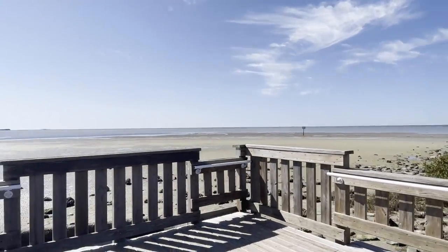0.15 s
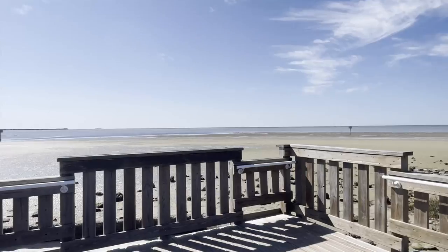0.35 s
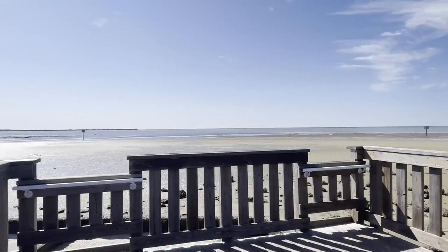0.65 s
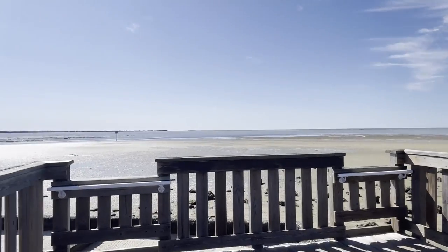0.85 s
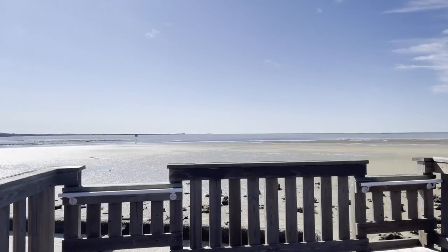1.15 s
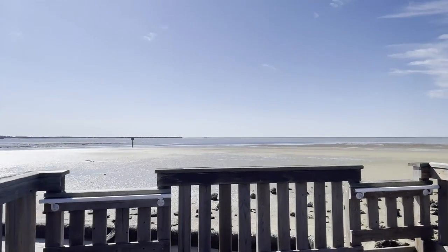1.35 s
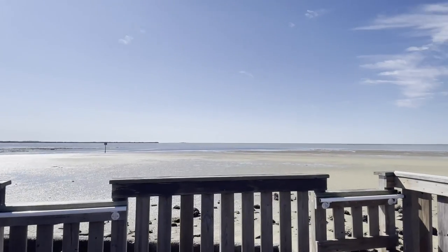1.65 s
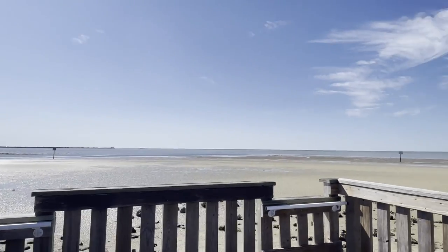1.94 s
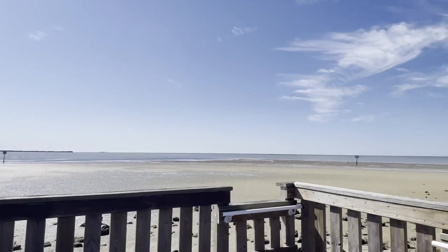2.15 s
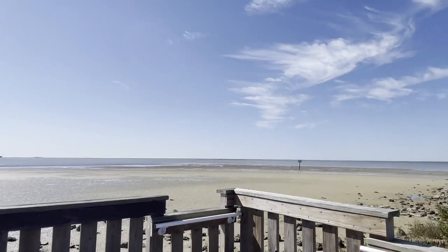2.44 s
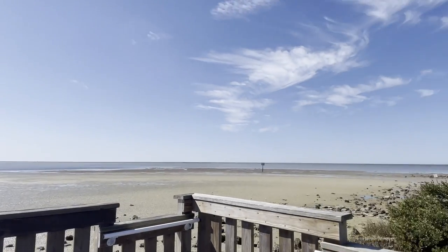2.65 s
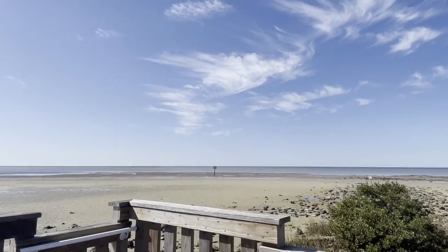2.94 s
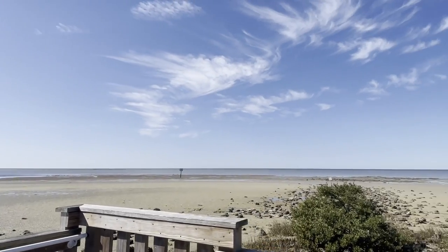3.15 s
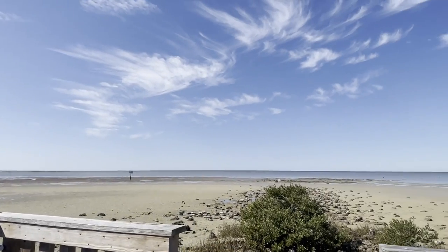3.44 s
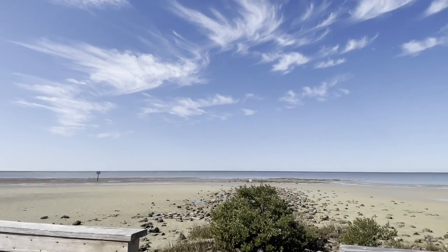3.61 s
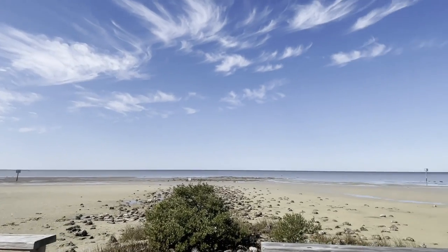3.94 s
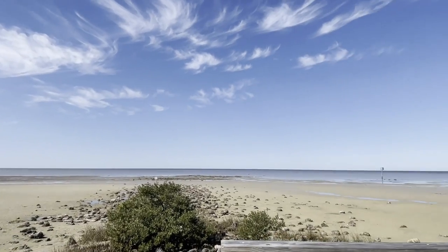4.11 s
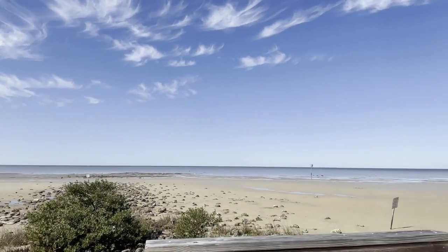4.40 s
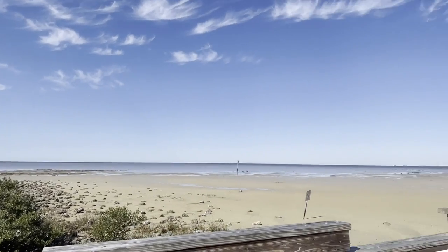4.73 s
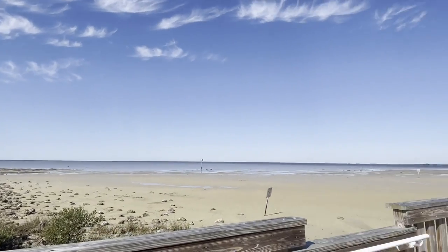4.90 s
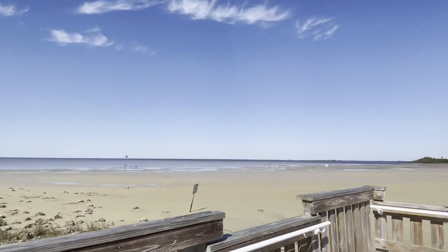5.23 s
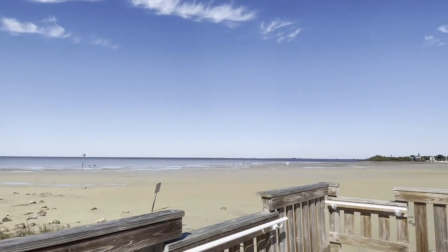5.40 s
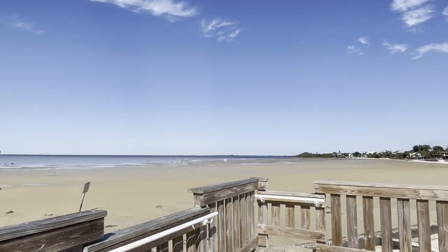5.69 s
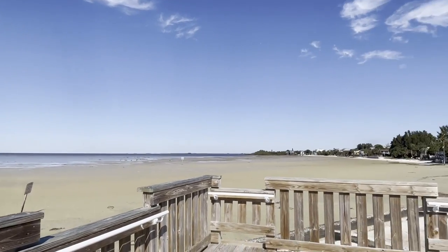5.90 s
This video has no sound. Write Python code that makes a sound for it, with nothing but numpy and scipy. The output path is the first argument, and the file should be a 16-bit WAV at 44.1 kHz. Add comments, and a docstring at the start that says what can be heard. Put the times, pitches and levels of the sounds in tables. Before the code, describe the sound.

After a rumbling gust, hollow, gritty steps cross a seaside boardwalk, with thin falling bird whistles and a faint wash of sea.

```python
"""A walk on a wooden boardwalk by the shore, heard on the left channel only, over a wash of far water.
First, clothes rustle and tick and the grip squeaks as a gust builds and buffets the microphone.
From 1.6 s, as the wind drops, ten evenly paced steps boom through planks and joists, each with a
sandy scuff. A bird joins in with thin, falling whistles that scatter off the deck and railings.
From about 4 s the steps grow lighter, leaving mostly the scuff of the soles."""
import sys
import numpy as np
from scipy import signal
from scipy.fft import rfft
from scipy.io import wavfile
from scipy.ndimage import uniform_filter1d

SR = 44100
rng = np.random.default_rng(int(sys.argv[2]) if len(sys.argv) > 2 else 0)


def bounce(signal):
    """Save signal as a 16-bit WAV file at the path given by the first command-line argument."""
    frames = np.transpose(np.atleast_2d(signal))
    limited = np.clip(frames, -1, 1)
    pcm = np.round(limited * 32767).astype(np.int16)
    wavfile.write(sys.argv[1], SR, pcm)


N = 267113
TIME = np.arange(N) / SR

# footfalls, with relative levels: (time [s], weight on the frame [dB], plank knock [dB],
# hollow ring [dB], scuff [dB], scuff centre [Hz], scuff focus [dB/octave^2], sand [dB])
FOOTFALLS = [(1.578, -65.5, -55.5, -67.5, -63.5, 1370, 7, -84),
             (2.067, -62.5, -56.5, -60.5, -60.5, 1440, 9, -79), (2.535, -65, -60, -68, -61.5, 940, 33, -73),
             (3.017, -67.5, -63.5, -57, -61, 1250, 5.5, -76),
             (3.489, -64, -60, -74, -55.5, 1310, 7.5, -71.5),
             (3.929, -74.5, -75, -68.5, -58.5, 1590, 0, -70.5),
             (4.364, -73.5, -74, -68, -60, 1630, 2.5, -70.5), (4.785, -84.5, -88, -81, -66, 1260, 13, -80),
             (5.235, -90, -72.5, -84, -63.5, 1120, 31, -75), (5.69, -78, -70, -91, -64, 1480, -4, -85)]
# the deck's deepest ring, two close modes that beat slowly: (frequency [Hz], t60 [s])
JOIST_MODES = [(178.7, 1.2), (183.7, 1.3)]
# higher ringing of the planks: (frequency [Hz], relative level [dB], t60 [s])
PLANK_MODES = [(208.4, 6.5, 0.71), (324.5, 11.5, 0.36), (346.7, 10.5, 0.64), (393, 10, 0.83),
               (481.6, -0.5, 0.8), (622, -1, 0.63), (664, -9, 0.94), (744, -5, .8), (921, 1, 0.77),
               (1093, -11.5, 1), (1330, -9, 1), (1585, -7.5, 0.69), (1760, -6.5, 0.54)]
# tone of the plank knock, trodden board, sole scuff and sand: (frequency [Hz], gain [dB])
KNOCK_EQ = [(90, -7), (170, 7.5), (270, 0), (345, 8), (440, -3), (520, -1), (650, -1), (800, -22),
            (1000, -35), (1800, -10.5), (2800, -46), (6000, -69)]
BOARD_EQ = [(300, -26), (480, -17), (580, -3.5), (625, 4.5), (680, -4.5), (780, -28), (2000, -88)]
SCUFF_EQ = [(300, -28), (900, 3.5), (1120, 2), (1300, 3), (1480, -6), (1650, 1.5), (2150, 1), (2700, -13),
            (3300, 2.5), (4000, -11), (4700, -27), (6500, -43), (12000, -52)]
SAND_EQ = [(2300, -22), (3100, -2.5), (3950, 2.5), (4500, -20), (7000, -47)]

# wind strength, one strong gust that dies down: (time [s], relative level [dB])
WIND_STRENGTH = [(0, -52.5), (.28, -63), (.4, -59), (.57, -60.5), (.69, -52), (1.0, -55), (1.17, -47),
                 (1.38, -44), (1.55, -48), (1.75, -55), (2.25, -56.5), (2.85, -57.5), (3.05, -60),
                 (3.3, -59), (3.55, -61.5), (4.2, -68), (5.9, -67), (6.05, -59)]
# single eddies hitting the microphone: (time [s], width [s], peak [dB])
WIND_BUFFETS = [(.04, .012, -31), (.775, .013, -32), (1.18, .012, -27), (1.37, .0095, -26),
                (1.552, .007, -31)]
# hollow puffs of air across the microphone port: (time [s], length [s], level [dB])
PORT_PUFFS = [(0, 0.076, -65.5), (0.711, 0.21, -65.5), (1.139, 0.19, -64), (1.803, 0.039, -59.5)]
# tone of the wind's slow pressure, its flutter and its puffs: (frequency [Hz], gain [dB])
PRESSURE_EQ = [(2, -3), (6, 10.5), (13, -5.5), (20, -2.5), (32, -34), (90, -101)]
FLUTTER_EQ = [(12, -17), (24, 4), (35, 2), (62, -7.5), (85, -17), (125, -22), (250, -44.5), (500, -59),
              (1500, -100)]
PUFF_EQ = [(80, -21), (210, 7), (270, 0.5), (350, -7.5), (900, -45)]

# bird notes: (time [s], length [s], top pitch [Hz], final pitch [Hz], sag of the slide [exponent],
# direct level [dB], near scatter [dB], far tail [dB])
BIRD_NOTES = [(1.822, .1, 3980, 3330, 1.4, -74, -72, -80), (2.756, .125, 4100, 3310, 2.9, -65, -71, -71),
              (3.739, .108, 3990, 3100, 1.6, -59, -68.5, -73),
              (4.562, .107, 3900, 3190, 2.6, -61, -67.5, -73),
              (5.746, .098, 3800, 3410, 2.5, -63, -68, -75), (5.849, .022, 3350, 3000, 1, -69, -74, -80)]

# ticks of clothing and grit: (time [s], relative level [dB], pitch [Hz], t60 [s], low-pass [Hz])
CLOTHING_TICKS = [(0.0312, -51.5, 5900, 0.006, 12000), (0.1418, -40, 2960, 0.013, 3300),
                  (0.1416, -50, 458, 0.029, 2220), (.874, -53, 2150, 0.016, 4000),
                  (1.3575, -55.5, 3830, 0.016, 8000), (1.5354, -42.5, 4630, .006, 13000),
                  (1.548, -51, 4200, 0.009, 5000), (2.5417, -52.5, 3800, 0.009, 9500),
                  (2.5527, -51, 2860, 0.022, 9600), (4.152, -53.5, 4000, 0.011, 8500),
                  (5.381, -56.5, 6400, 0.016, 9000)]
# squeaks of the grip: (time [s], length [s], first pitch [Hz], last pitch [Hz], peak [dB])
GRIP_SQUEAKS = [(1.15, 0.0081, 4280, 1680, -51.5), (1.151, 0.016, 4220, 2650, -54)]
# sleeve and jacket brushing as the body moves: (middle [s], length [s], level [dB])
SLEEVE_BRUSHES = [(0.006, 0.059, -64.5), (0.575, 0.15, -71), (0.833, 0.63, -74), (1.168, 0.21, -71.5),
                  (1.567, 1, -73.5), (2.258, 0.18, -71), (2.563, 0.073, -70), (2.91, 0.96, -77.5),
                  (3.537, .05, -72), (4.132, 0.17, -73.5), (5.291, 0.34, -70), (5.577, 0.58, -77)]
# tone of the ticks and of rubbing cloth: (frequency [Hz], gain [dB])
TICK_EQ = [(200, -14), (1000, -10), (2000, -5), (3700, 0), (4500, 0), (5300, -6), (6500, -3), (10000, -16),
           (15000, -27)]
CLOTH_EQ = [(500, -3), (1500, -1.5), (3650, 2.5), (4200, -1), (4900, -9), (6300, -3.5), (7800, -9),
            (10000, -17), (15000, -24.5)]

# tone of the distant sea and breeze, and of a thin hiss: (frequency [Hz], gain [dB])
SHORE_EQ = [(60, 5), (130, 2), (350, -6.5), (700, -4), (1200, -8.5), (2500, -11.5), (3600, -14),
            (4900, -25.5), (6400, -25.5), (9500, -33.5), (15000, -39.5)]
THIN_HISS_EQ = [(1500, -22), (2450, 3), (3000, -9), (4500, -18), (5900, -6.5), (6900, -27), (12000, -24)]
# fader moves for those two beds: (time [s], level [dB])
SHORE_FADER = [(0, -63.5), (1.2, -69), (1.7, -64), (3.5, -65.5), (5, -71), (6.06, -68.5)]
THIN_HISS_FADER = [(1.2, -100), (1.45, -76.5), (2.3, -72), (2.6, -89), (3.65, -102)]


def footsteps(boom_db=10, ring_db=1, scuff_trim_db=1, blur_t60=0.78, board_t60=0.67):
    """Each footfall booms in the joists and rings the planks while the sole scuffs over sandy wood."""
    out, t = np.zeros(N), np.arange(SR) / SR
    hz, db, t60 = np.transpose(PLANK_MODES)[:, :, None]
    spot_db, detune, build_cycles = 1.2, .002, 18
    boom = sum(np.sin(2 * np.pi * f * t) * swell(t, 0.087, decay) for f, decay in JOIST_MODES)
    for s, weight_db, knock_db, hollow_db, scuff_db, centre_hz, focus_db, sand_db in FOOTFALLS:
        # each spot on the deck favours and bends other modes
        louder, sharper, phase = rng.standard_normal((3, *hz.shape))
        modes = np.sin(2 * np.pi * (hz * (1 + detune * sharper) * t + phase))
        ring = (gain_of(db + spot_db * louder) * modes * swell(t, build_cycles / hz, t60)).sum(0)
        frame = gain_of(weight_db) * (gain_of(boom_db) * boom + gain_of(ring_db) * ring)
        knock = gain_of(knock_db) * equalise(noise(SR), KNOCK_EQ) * swell(t, 0.015, blur_t60)
        hollow = gain_of(hollow_db) * equalise(noise(SR), BOARD_EQ) * swell(t, 0.0053, board_t60)
        # the heel lands at once, softer on light steps, then the sole rolls down
        heel = np.interp(weight_db, [-80, -66], [.1, .5])
        tread = heel * swell(t, 0.0025, 0.13) + swell(t, 0.028, blur_t60)
        scuff = equalise(board_noise(SR), SCUFF_EQ, centre_hz, focus_db) * tread
        sand = gain_of(sand_db) * equalise(board_noise(SR), SAND_EQ) * tread
        add(out, s, frame + knock + hollow + sand + gain_of(scuff_db + scuff_trim_db) * scuff)
    return out


def board_noise(size, width_hz=110, depth_db=3.2):
    """Friction noise through one board's own uneven set of broad resonances."""
    spectrum = rfft(noise(size))
    bumps = uniform_filter1d(noise(len(spectrum)), round(width_hz * size / SR))
    return np.fft.irfft(spectrum * gain_of(depth_db * np.clip(unit_rms(bumps), -2, 2)), size)


def wind(ceiling_db=-22, knee_db=-57, steepness=2.45, flutter_db=4, gusty_db=1.8):
    """Wind strength drives slow pressure swings and faster eddies; puffs cross the microphone port."""
    strength = fader(WIND_STRENGTH)
    push = gain_of(ceiling_db) / (1 + (gain_of(knee_db) / strength) ** steepness)  # flattens past the knee
    pressure = equalise(noise(N), PRESSURE_EQ) * push
    flutter = equalise(noise(N), FLUTTER_EQ) * strength * gain_of(gusty_db * drift(N, 12))
    out = pressure + buffets() + gain_of(flutter_db) * flutter
    for s, length, db in PORT_PUFFS:
        fade = signal.windows.tukey(round(length * SR), .7)
        add(out, s, gain_of(db) * fade * equalise(noise(SR), PUFF_EQ)[:len(fade)])
    return out * signal.windows.tukey(N, .008)


def buffets():
    """Each large eddy is one push on the microphone between two shallow dips."""
    out = np.zeros(N)
    for s, width, db in WIND_BUFFETS:
        u = (TIME - s) / width
        out += gain_of(db) * (1 - u ** 2) * np.exp(-u ** 2 / 2)
    return out


def bird(echoes_per_s=2000):
    """Deck and railings scatter the whistles; the shore returns a faint, longer tail."""
    out, t = np.zeros(N), np.arange(SR // 2) / SR
    near_tail, far_tail = swell(t, 0.0016, t60=.08), swell(t, .008, t60=.65)
    for s, length, top_hz, final_hz, sag, direct_db, near_db, far_db in BIRD_NOTES:
        note = whistle(length, top_hz, final_hz, sag)
        add(out, s, gain_of(direct_db) * note)
        for db, tail in (near_db, near_tail), (far_db, far_tail):
            echoes = noise(len(t)) * (rng.random(len(t)) < echoes_per_s / SR) * tail
            add(out, s, gain_of(db) * signal.fftconvolve(note, echoes / np.linalg.norm(echoes)))
    return out


def whistle(length, top_hz, final_hz, sag, start_hz=2950, flick_s=.013, flutter_db=3.2, waver=.0055):
    """A near-pure, fluttering note that flicks up, then slides down."""
    t = np.arange(round(length * SR)) / SR
    slide = final_hz + (top_hz - final_hz) * np.clip((length - t) / (length - flick_s), 0, 1) ** sag
    scoop = (top_hz - start_hz) * (1 - np.sin(np.pi / 2 * np.minimum(t / flick_s, 1)))
    hz = (slide - scoop) * (1 + waver * drift(len(t), 200))
    envelope = (.75 + np.sin(np.pi * t / length) ** 2) * signal.windows.tukey(len(t), .12)
    flutter = gain_of(flutter_db * drift(len(t), 72))
    return unit_rms(envelope * flutter * np.sin(2 * np.pi * np.cumsum(hz) / SR))


def ticks(focus_db=2):
    """Clothing and grit click up close: a snap, then a tiny ping in a crackle; some dull, some crisp."""
    out, t = np.zeros(N), np.arange(4096) / SR
    for s, db, hz, t60, lowpass_hz in CLOTHING_TICKS:
        pulse = equalise(signal.unit_impulse(len(t), 24), TICK_EQ, hz, focus_db)
        snap = 1.7 * pulse / pulse.max() * (t < t[-1] / 2)
        ping = .7 * np.sin(2 * np.pi * hz * t)
        crackle = .4 * equalise(noise(len(t)), TICK_EQ, hz, focus_db)
        click = snap + (ping + crackle) * swell(t, .0002, t60)
        lowpass = signal.butter(6, lowpass_hz, fs=SR, output="sos")
        add(out, s, gain_of(db) * signal.sosfilt(lowpass, click))
    return out


def squeaks():
    """The grip slips for a few milliseconds, its pitch dropping."""
    out = np.zeros(N)
    for s, length, first_hz, last_hz, db in GRIP_SQUEAKS:
        u = np.linspace(0, 1, round(length * SR))
        hz = last_hz + (first_hz - last_hz) * (1 - u) ** 2
        add(out, s, gain_of(db) * np.sin(np.pi * u) * np.sin(2 * np.pi * np.cumsum(hz) / SR))
    return out


def cloth(smooth_rub=0.48, catches_per_s=700, spread_db=4.8):
    """Fibres catch and let go in many tiny grains over a smooth rubbing hiss."""
    catches = rng.random(N) < catches_per_s / SR
    grains = catches * gain_of(spread_db * np.minimum(rng.exponential(1, N), 3))
    return equalise(noise(N) * (smooth_rub + grains), CLOTH_EQ) * rubbing()


def rubbing(rustle_db=-82, rise_from_s=1.9, rise_db_per_s=0.5):
    """How hard the cloth rubs: brushes swell and fade over a light rustle that slowly creeps up."""
    power = gain_of(rustle_db + rise_db_per_s * np.maximum(TIME - rise_from_s, 0)) ** 2
    for s, length, db in SLEEVE_BRUSHES:
        arch = np.cos(np.pi * np.clip((TIME - s) / length, -.5, .5))
        power += (gain_of(db) * arch) ** 2
    return np.sqrt(power)


def shore():
    """A soft bed of far water and breeze."""
    return equalise(noise(N), SHORE_EQ) * fader(SHORE_FADER)


def thin_hiss(waver_db=1.6):
    """A narrow hiss swells behind the first steps, wavering a little."""
    return equalise(noise(N), THIN_HISS_EQ) * fader(THIN_HISS_FADER) * gain_of(waver_db * drift(N, 13))


def far_tone(hz=737, width_hz=9, db=-85):
    """A faint, wavering tone hangs in the distance."""
    band = 1 + ((np.fft.rfftfreq(N, 1 / SR) - hz) / width_hz) ** 2
    return gain_of(db) * unit_rms(np.fft.irfft(rfft(noise(N)) / band, N))


def gain_of(db):
    """Decibels to amplitude."""
    return 10 ** (np.asarray(db) / 20)


def unit_rms(x):
    """Scales to rms 1."""
    return x / np.sqrt(np.mean(x ** 2) + 1e-30)


def noise(size):
    """White noise."""
    return rng.standard_normal(size)


def fader(points):
    """A level curve in dB as a gain for every sample."""
    return gain_of(np.interp(TIME, *np.transpose(points)))


def add(mix, s, sound):
    """Mixes a sound in at time s."""
    part = mix[max(round(s * SR), 0):][:len(sound)]
    part += sound[:len(part)]


def equalise(x, curve, centre_hz=1000, focus_db=0):
    """Applies an EQ curve; a positive focus favours the octaves near the centre. Returns rms 1."""
    hz = np.fft.rfftfreq(len(x), 1 / SR)
    curve_hz, curve_db = np.transpose(curve)
    db = np.interp(np.log(hz + 1), np.log(curve_hz + 1), curve_db)
    db -= max(focus_db, 0) * np.log2((hz + 1) / centre_hz) ** 2
    return unit_rms(np.fft.irfft(rfft(x) * gain_of(db), len(x)))


def drift(size, rate_hz):
    """Smooth random wandering, rms about 1."""
    hz = np.fft.rfftfreq(N, 1 / SR)
    return unit_rms(np.fft.irfft(rfft(noise(N)) / (1 + (hz / rate_hz) ** 4), N))[:size]


def swell(t, attack_s, t60):
    """A soft attack and an exponential decay."""
    return (1 - np.exp(-t / attack_s)) * gain_of(-60 * t / t60)


def scene(hiss_db=-84):
    """Everything reaches one microphone, on the left channel, over its own steady hiss."""
    mono = footsteps() + ticks() + squeaks() + bird() + wind() + shore() + cloth()
    mono += thin_hiss() + far_tone() + gain_of(hiss_db) * noise(N)
    return np.array([mono, np.zeros(N)])


def record(dry, cutoff_hz=15750):
    """The recorder's band limit shaves off the top treble."""
    lowpass = signal.firwin(511, cutoff_hz, window=("kaiser", 9), fs=SR)
    return signal.oaconvolve(dry, lowpass[None], "same")


dry = scene()
out = record(dry)
bounce(out)
```